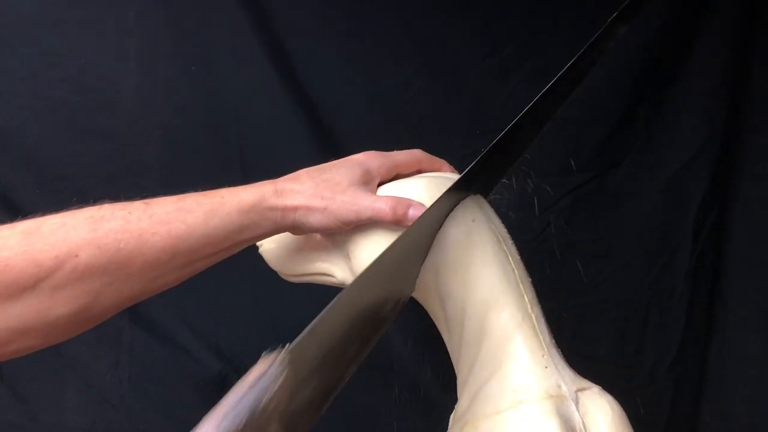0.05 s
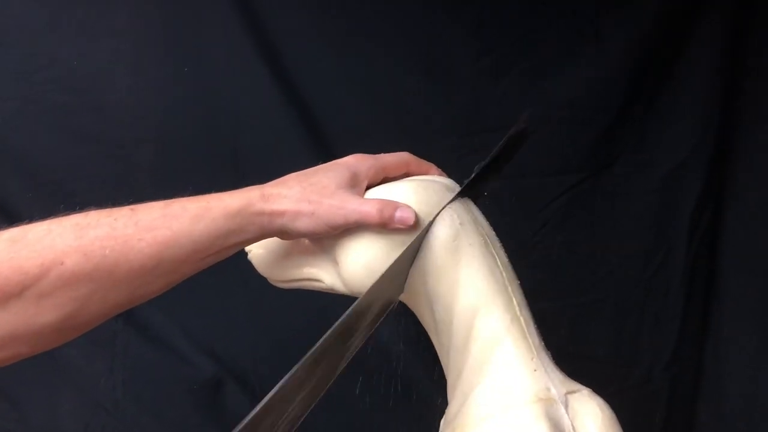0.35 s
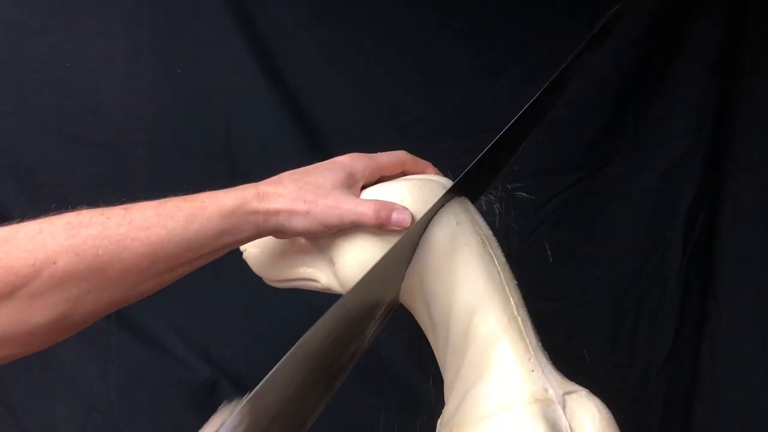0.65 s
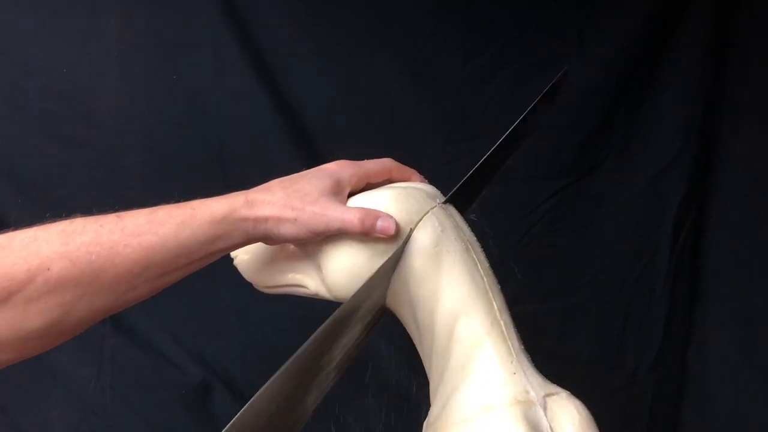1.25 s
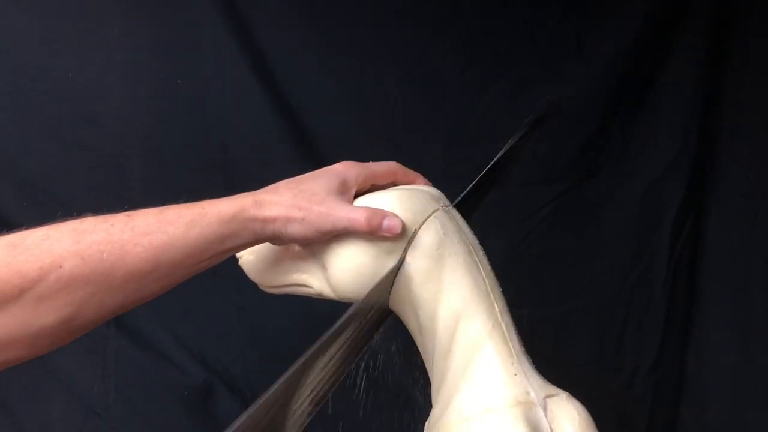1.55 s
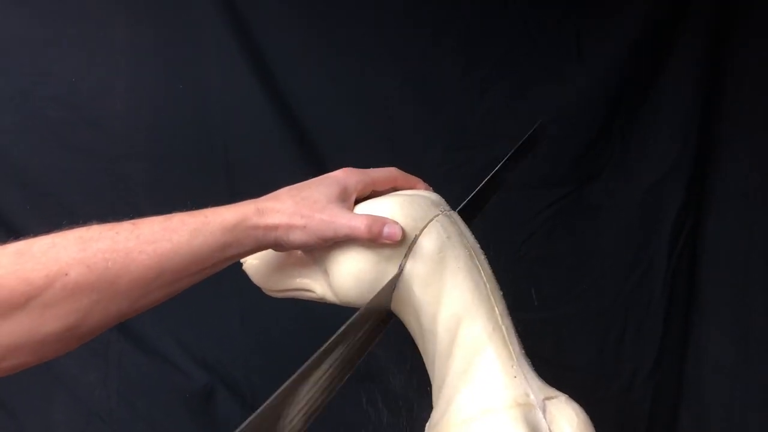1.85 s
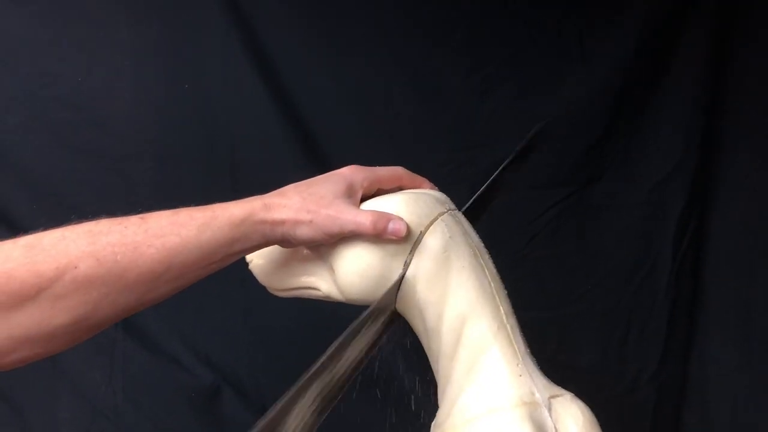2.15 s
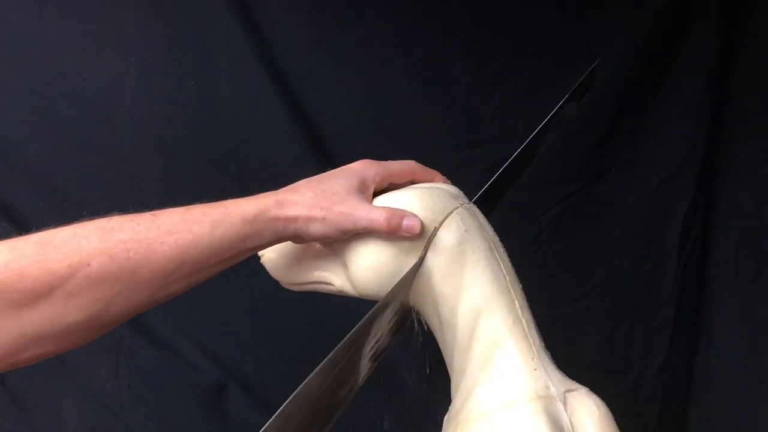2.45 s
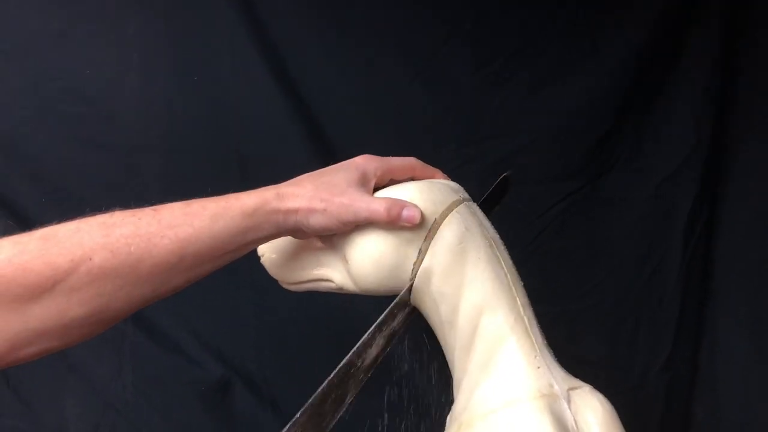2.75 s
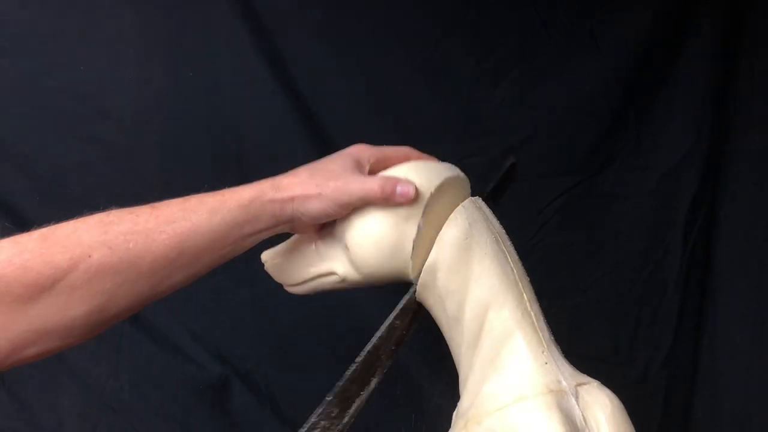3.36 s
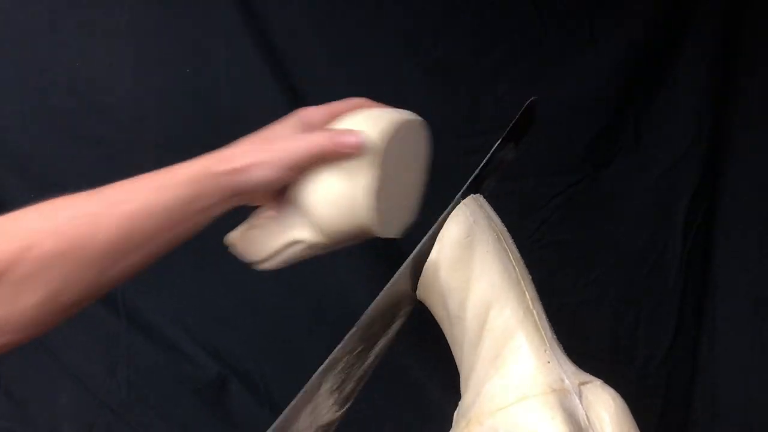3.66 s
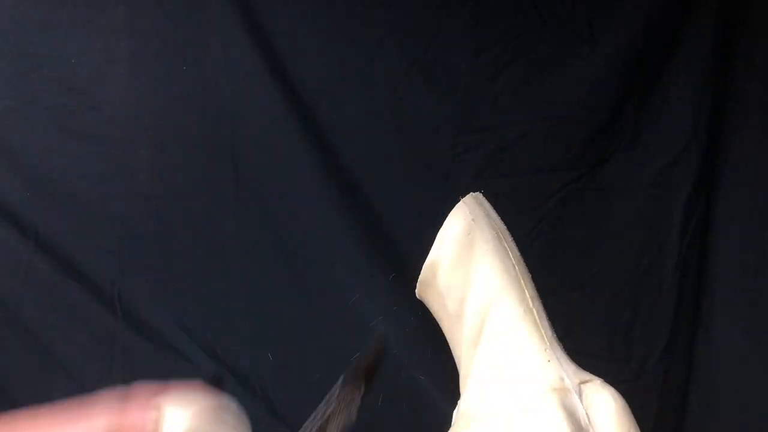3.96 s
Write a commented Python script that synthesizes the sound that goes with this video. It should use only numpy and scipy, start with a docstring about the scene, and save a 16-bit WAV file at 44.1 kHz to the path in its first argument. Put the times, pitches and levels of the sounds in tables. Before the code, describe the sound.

A hand saw rasps back and forth through rigid foam until a piece snaps free.

```python
"""A hand saw rasps through a rigid foam form, heard close in a small room. For six strokes to and fro
the teeth crush foam cells while the form rumbles on its stand; the pushes bite deeper with a low
growl, and the second to fourth pulls squeak. Near 3.4 s the last bridge of foam snaps and the blade
slides along the loose piece. Two short scrapes follow, the second with a faint low tone."""
import sys
import numpy as np
from scipy import signal
from scipy.fft import rfft, irfft
from scipy.io import wavfile
from scipy.ndimage import map_coordinates

SR = 44100
rng = np.random.default_rng(int(sys.argv[2]) if len(sys.argv) > 2 else 0)


def output_pcm(signal):
    """Save a mono or channel-first signal as 16-bit PCM at the path in sys.argv[1].

    Samples are clipped to [-1, 1] before scaling.
    """
    pcm = np.clip(np.atleast_2d(signal).T, -1, 1) * 32767
    wavfile.write(sys.argv[1], SR, np.round(pcm).astype(np.int16))


N = 176400
T = np.arange(N) / SR

# Saw strokes. Each row: start and end in seconds, level in dB, body and fizz offsets in dB,
# exponent of speed in the loudness, fastest point as a fraction of the stroke.
PUSHES = [(-.13, 0.194, -22, -2, -1, 1.27, .53), (.5, 0.843, -21.5, -4.5, 0, 1.35, .55),
          (1.149, 1.46, -21, -6, -1, 1.2, .6), (1.802, 2.087, -25, -5, 1, 1.14, .48),
          (2.335, 2.596, -25, -7.5, 0, 0.99, .5), (2.855, 3.135, -26, -6.5, -1.5, 1, .42)]
PULLS = [(.2, .518, -26, -1, -2.5, 0.51, 0.64), (.848, 1.168, -25, -3.5, -2, 0.55, .55),
         (1.478, 1.815, -28, -3.5, -0.5, 0.43, 0.34), (2.092, 2.346, -25.5, -3.5, -5, 0.76, .56),
         (2.6, 2.864, -27.5, -1, -3.5, 0.66, .55), (3.152, 3.46, -28, -0.5, -8.5, 0.71, 0.51)]
# Spectra of the contacts. Each row: frequency in Hz, relative spectral density in dB.
PUSH_SPECTRUM = [(110, -29), (180, 0.5), (315, -2), (394, -0.5), (541, -4), (594, -1.5), (652, -3),
                 (1080, -4), (1400, -3.5), (1560, -5.5), (2190, -3.5), (2360, -4), (3620, -2), (7920, -3),
                 (15500, -9.5)]
PULL_SPECTRUM = [(59, -33), (100, -24), (188, -4.5), (243, -8), (326, -8.5), (378, -6.5), (457, -6),
                 (497, -14.5), (530, -6), (614, -13.5), (682, -11.5), (791, -2.5), (998, -12.5), (1110, -2),
                 (1290, -8), (1400, -2.5), (1520, -7.5), (2040, -4), (2420, -6.5), (2810, -3.5), (3320, -3),
                 (3850, -1.5), (5510, -2.5), (7890, -0.5), (15500, -5.5)]
SNAP_SPECTRUM = [(180, -40), (300, -16), (953, -9.5), (2140, -11.5), (2610, -12), (4960, -2), (6570, -5),
                 (9760, -16), (11100, -6), (15500, -15)]
SLIDE_SPECTRUM = [(88, -46), (150, -13), (373, -17), (411, -31), (631, -30), (781, -14.5), (1480, -21),
                  (2270, -13.5), (2600, -9.5), (3350, -12), (3830, -7), (4390, -8), (6110, -12.5),
                  (7410, -7.5), (8170, -10.5), (10900, -14.5), (15500, -21.5)]
SCRAPE_SPECTRUM = [(88, -44), (150, -16), (268, -10), (509, -14), (766, -5.5), (985, -14), (1150, -7),
                   (1510, -18), (2140, -4.5), (2310, -11.5), (3160, -5.5), (7000, -11.5), (7860, -6.5),
                   (9000, -12), (15500, -23)]
# Resonances of blade and form. Each row: frequency in Hz, relative level in dB.
MODES = [(597.5, -61), (710.6, -60), (1427, -58), (1986, -57), (2126, -57), (2536, -57), (2778, -56),
         (3725, -54), (5050, -56)]
# Low, fuzzy, gliding growls of the saw on the pushes (and faintly at the end); squeaks on the pulls.
# Each row: start and end in seconds, first, middle and last frequency in Hz, level in dB.
GROWLS = [(-.02, .13, 484, 405, 334, -39.5), (.04, .19, 185, 135, 119, -41), (.56, .73, 120, 145, 254, -43),
          (.61, .7, 356, 371, 387, -41), (.68, .81, 270, 187, 147, -36.5), (1.26, 1.41, 380, 413, 316, -38),
          (1.27, 1.44, 170, 244, 192, -39), (1.87, 2.0, 130, 165.4, 200, -47.5),
          (1.98, 2.06, 261, 227, 196, -38.5), (2.36, 2.6, 167, 200, 160, -43.5),
          (2.87, 3.1, 161.3, 180, 168, -46.5), (3.88, 3.99, 352, 352, 352, -54),
          (3.925, 3.98, 277, 275, 270, -48)]
SQUEAKS = [(.91, 1.04, 13200, 14100, 13800, -32), (1.015, 1.06, 14300, 15300, 14800, -26.5),
           (1.04, 1.162, 14500, 14400, 13400, -31), (1.505, 1.543, 10500, 13200, 14200, -35),
           (1.76, 1.802, 14400, 13100, 11200, -34), (2.103, 2.13, 10800, 12400, 13200, -45)]
# Foam bridges breaking. Each row: time in seconds, relative level in dB.
SNAPS = [(2.358, -27.5), (2.484, -29), (3.311, -28), (3.3852, -17), (3.55, -43), (3.627, -50)]
# Envelopes of the sliding blade and the shaking form. Each row: time in seconds, level in dB.
SLIDE_LEVELS = [(3.38, -60), (3.41, -47), (3.48, -39.5), (3.535, -45.5), (3.575, -36.5), (3.63, -49),
                (3.665, -42), (3.705, -47.5), (3.73, -88)]
SHAKE_LEVELS = [(0.0, -52), (0.17, -51.5), (0.38, -60), (0.5, -46.5), (1.05, -60.5), (1.12, -44.5),
                (1.73, -59), (1.8, -48.5), (2.31, -61.5), (2.4, -45.5), (2.68, -62.5), (2.81, -52),
                (3.11, -56), (3.14, -67), (3.37, -54), (3.63, -76), (3.9, -60), (3.99, -68)]
# Catches on the cut edge. Each row: start and hold in seconds, level and swell in dB, release in seconds.
SCRAPES = [(3.8, 0.024, -34.5, -3, 0.012), (3.8835, 0.029, -33, 4, 0.0046)]
# Spectra of the form's rumble and the room's air. Each row: frequency in Hz, relative density in dB.
SHAKE_SPECTRUM = [(20, -40), (32, -14), (48, -2), (80, -1), (125, 3), (190, -9), (400, -40)]
AIR_SPECTRUM = [(24, -33), (40, -9), (407, 1.5), (758, -10.5), (1020, -9), (1350, -7), (2330, -14),
                (3300, -20), (15500, -33)]
# Reverberation. Each row: frequency in Hz, time to fall 60 dB in seconds.
ROOM_T60 = [(100, 0.75), (500, 0.63), (2000, 0.34), (6000, 0.23), (15000, 0.053)]

CELLS_PER_S, CELL_SPREAD_DB, RUB_SHARE = 7000, 2.5, 0.71
SMEAR_S, SMEAR_HZ = .003, 999  # bending-wave delay at one frequency; lower waves arrive later
TOOTH_HZ, TOOTH_DEPTH, JUDDER_DB = 380, 0.12, 0.5
GRIP_SPEED = .15  # share of full speed below which the teeth lose their bite
BODY_BELOW_HZ, FIZZ_ABOVE_HZ = 1300, 8000
BLADE_ECHO_S, BLADE_TRAVEL_S, BLADE_ECHO_GAIN = .0016, 0.000414, 0.14
MODE_WIDTH_HZ, GROWL_WIDTH_HZ, SQUEAK_WIDTH_HZ = 40, 50, 1200
SNAP_DECAY_S = 0.0032
RING_DB, CONTACT_DB, TAIL_DB, EARLY_DB, AIR_DB = -4.5, -55, -18, -10.5, -60


def saw_strokes(rows, spectrum):
    """Amplitude modulation: passing teeth pulse the crushing noise at a rate proportional to speed."""
    pace, gains = np.zeros(N), np.zeros((3, N))
    for start, end, db, body_db, fizz_db, exponent, fastest in rows:
        peak_s = start + (end - start) * fastest
        speed = np.sin(np.pi * np.interp(T, [start, peak_s, end], [0, .5, 1])).clip(0)
        grip = 1 - np.exp(-(speed / GRIP_SPEED) ** 2)
        pace += speed
        gains += amp([[db + body_db], [db], [db + fizz_db]]) * speed ** exponent * grip
    tooth_hz = TOOTH_HZ * pace * (1 + .15 * wander(40.15))
    teeth = 1 + TOOTH_DEPTH * np.cos(2 * np.pi * np.cumsum(tooth_hz) / SR)
    rasp = colour(unit(crunch() * teeth * amp(JUDDER_DB * wander(56))), spectrum)
    body = signal.sosfiltfilt(signal.butter(2, BODY_BELOW_HZ, fs=SR, output="sos"), rasp)
    below_fizz = signal.sosfiltfilt(signal.butter(2, FIZZ_ABOVE_HZ, fs=SR, output="sos"), rasp)
    return gains[0] * body + gains[1] * (below_fizz - body) + gains[2] * (rasp - below_fizz)


def crunch():
    """Shot noise of bursting cells, smeared by dispersion in the blade, over smooth friction noise."""
    size = amp(CELL_SPREAD_DB * np.minimum(rng.exponential(1, N), 4))
    bursts = size * rng.choice([-1, 1], N) * (rng.random(N) < CELLS_PER_S / SR)
    hz = np.fft.rfftfreq(N, 1 / SR)
    dispersion = np.exp(-4j * np.pi * SMEAR_S * np.sqrt(hz * SMEAR_HZ))
    smeared = irfft(rfft(bursts) * dispersion, N)
    return unit(unit(smeared) + RUB_SHARE * rng.standard_normal(N))


def blade_echo(x):
    """Comb filtering: waves reflect from the blade's end with a delay that shifts as it travels."""
    turns = [s for row in PUSHES for s in row[:2]]
    position = np.cos(np.pi * np.interp(T, turns, np.arange(len(turns))))
    delay = BLADE_ECHO_S + BLADE_TRAVEL_S * position
    return x + BLADE_ECHO_GAIN * map_coordinates(x, [(T - delay) * SR], order=3)


def ring(x):
    """Forced vibration: the narrow modes of blade and form add to the sound that drives them."""
    top_db = max(db for hz, db in MODES)
    modes = sum(amp(db - top_db) * resonate(x, hz, MODE_WIDTH_HZ) for hz, db in MODES)
    return x + 2 * amp(RING_DB) * modes


def saw_tones(rows, width_hz):
    """Noise in a gliding resonance gives the fuzzy tone of a growl or squeak, swelling and fading."""
    out = np.zeros(N)
    for start, end, first_hz, middle_hz, last_hz, db in rows:
        active = (T > start) & (T < end)
        progress = (T[active] - start) / (end - start)
        hz = np.interp(progress, [0, .5, 1], [first_hz, middle_hz, last_hz])
        band = resonate(rng.standard_normal(len(hz)), hz, width_hz)
        tone = unit(resonate(band, hz, 2 * width_hz))
        out[active] += amp(db) * np.sin(np.pi * progress) * tone
    return out


def snaps():
    """Brittle fracture: each foam bridge gives an impulse and an exponentially fading crumble."""
    out = np.zeros(N)
    for start, db in SNAPS:
        at = round(start * SR)
        t = T[:N - at]
        crack = 4 * (t == 0)
        crumble = np.exp(-t / SNAP_DECAY_S) * rng.standard_normal(len(t))
        out[at:] += amp(db) * (crack + crumble)
    return colour(out, SNAP_SPECTRUM)


def scrapes():
    """Transient friction: the freed blade catches the cut edge twice."""
    level = np.zeros(N)
    for start, hold, db, swell_db, release in SCRAPES:
        t = T - start
        attack = np.clip(t / .0015, 0, 1)
        decay = np.exp(-np.maximum(t - hold, 0) / release)
        level += amp(db + swell_db * np.clip(t / hold, 0, 1)) * attack * decay
    return colour(crunch() * level, SCRAPE_SPECTRUM)


def slide():
    """Sliding friction: the blade rubs lightly and unevenly along the loose piece."""
    level = amp(np.interp(T, *np.transpose(SLIDE_LEVELS), left=-120, right=-120))
    return colour(crunch() * level * amp(1.5 * wander(65)), SLIDE_SPECTRUM)


def shake():
    """Low-frequency vibration of the form on its stand is heard as a rumble."""
    level = amp(np.interp(T, *np.transpose(SHAKE_LEVELS)))
    return level * colour(rng.standard_normal(N), SHAKE_SPECTRUM)


def contact():
    """Faint friction persists in the cut, even at the turns, until the last pull ends."""
    fade = np.clip((PULLS[-1][1] - T) / .1, 0, 1)
    return amp(CONTACT_DB) * fade * colour(crunch(), PULL_SPECTRUM)


def room(x):
    """Reverberation: eight early reflections and a diffuse tail whose treble dies first."""
    hz, t, noise = signal.stft(rng.standard_normal(SR // 2), SR, nperseg=256)
    decay = amp(-60 * t / read(ROOM_T60, hz)[:, None])
    tail = signal.istft(noise * decay * np.minimum(t / 0.0044, 1), SR, nperseg=256)[1]
    early = np.zeros(len(tail))
    early[(rng.uniform(.002, .014, size=8) * SR).astype(int)] = rng.choice([-1, 1], size=8)
    response = amp(TAIL_DB) * tail / np.linalg.norm(tail) + amp(EARLY_DB) * early / np.linalg.norm(early)
    return x + signal.fftconvolve(x, response)[:N]


def air():
    """Stationary noise forms the room's faint, low background."""
    return amp(AIR_DB) * colour(rng.standard_normal(N), AIR_SPECTRUM)


def amp(db):
    """Amplitude ratio of a level in decibels."""
    return 10 ** (np.asarray(db) / 20)


def unit(x):
    """Normalisation to rms 1."""
    return x / np.sqrt(np.mean(x ** 2) + 1e-20)


def read(points, hz):
    """Interpolation on a log-frequency axis."""
    table_hz, values = np.transpose(points)
    return np.interp(np.log(hz + 1), np.log(table_hz + 1), values)


def colour(x, spectrum, size=4096):
    """Minimum-phase filtering with the given spectral shape and unit energy."""
    hz = abs(np.fft.fftfreq(size, 1 / SR))
    log_gain = np.log(amp(read(spectrum, hz)))
    taps = np.fft.ifft(np.exp(np.conj(signal.hilbert(log_gain)))).real[:size // 2]
    return signal.oaconvolve(x, taps / np.linalg.norm(taps))[:N]


def wander(rate_hz):
    """Low-passed noise gives a random fluctuation of rms 1."""
    rolloff = 1 + (np.fft.rfftfreq(N, 1 / SR) / rate_hz) ** 4
    return unit(irfft(rfft(rng.standard_normal(N)) / rolloff, N))


def resonate(x, hz, width_hz):
    """A damped resonator of peak gain 1, steady or gliding in frequency."""
    carrier = np.exp(2j * np.pi * np.cumsum(hz * np.ones(len(x))) / SR)
    pole = np.exp(-np.pi * width_hz / SR)
    return 2 * (carrier * signal.lfilter([1 - pole], [1, -pole], x / carrier + 1e-18)).real


def scene():
    """Superposition of all sources in the room, the same in both channels."""
    sawing = saw_strokes(PUSHES, PUSH_SPECTRUM) + saw_strokes(PULLS, PULL_SPECTRUM) + contact()
    cutting = amp(-1) * (ring(blade_echo(sawing) + slide() + snaps()) + scrapes())
    tones = saw_tones(GROWLS, GROWL_WIDTH_HZ) + saw_tones(SQUEAKS, SQUEAK_WIDTH_HZ)
    mono = room(cutting + tones + shake()) + air()
    return np.array([mono, mono])


def record(dry):
    """Band limiting: a steep low-pass filter removes the highest treble."""
    lowpass = signal.firwin(1023, cutoff=15850, window=("kaiser", 9), fs=SR)
    return signal.oaconvolve(dry, lowpass[None], "same")


dry = scene()
out = record(dry)
output_pcm(out)
```